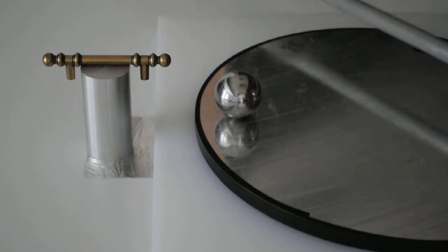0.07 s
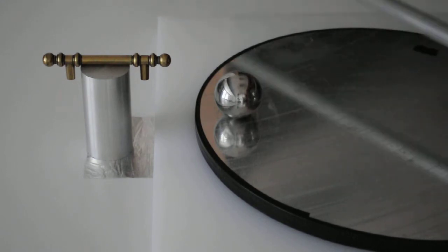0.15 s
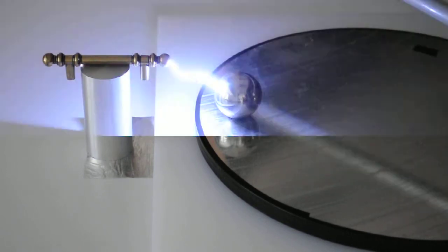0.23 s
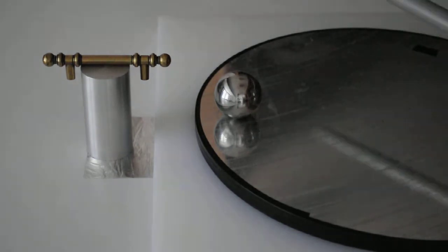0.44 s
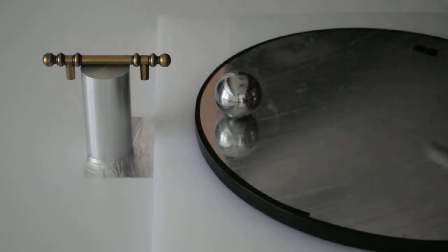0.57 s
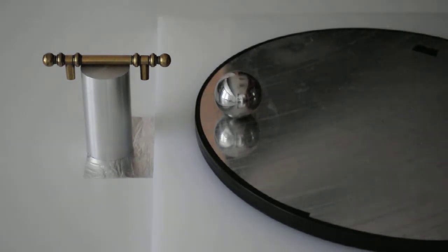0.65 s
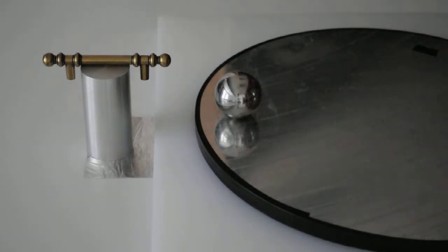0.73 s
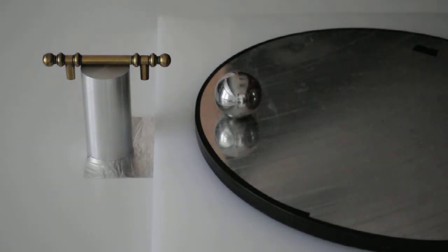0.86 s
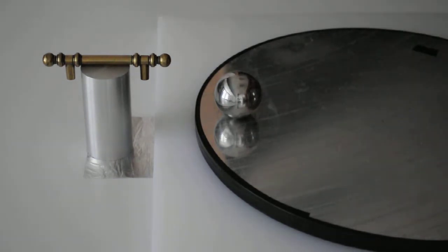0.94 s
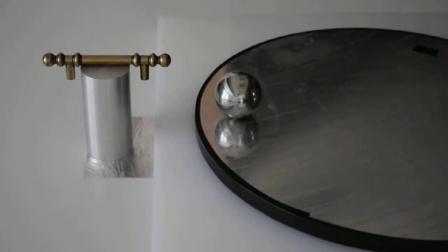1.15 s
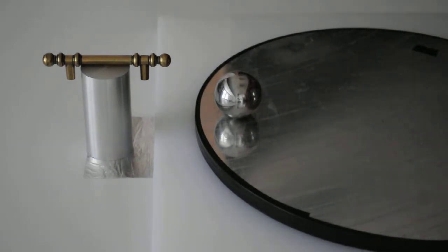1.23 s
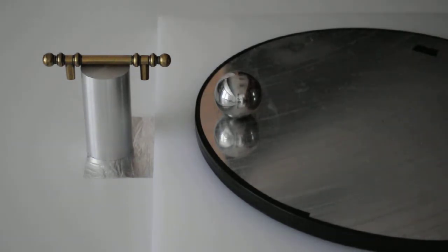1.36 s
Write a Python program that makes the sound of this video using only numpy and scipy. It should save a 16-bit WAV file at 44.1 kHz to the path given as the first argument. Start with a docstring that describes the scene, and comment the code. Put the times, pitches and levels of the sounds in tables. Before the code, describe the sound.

A single loud snap of an electric spark between metal parts follows a brief, faint crackle. It distorts the small microphone, then leaves a short, noisy echo in a hard-walled room with a faint ventilation rumble.

```python
"""In a hard-walled room with a low ventilation rumble, an electrostatic generator charges a metal ball.
Leaking charge hisses faintly and ticks; then one spark jumps to a brass rod and the heated air cracks.
The blast overloads a camera's small microphone and rings on as echoes and reverberation.
The camera's gain control ducks at the crack and swells back while the room dies away."""
import sys
import numpy as np
from scipy import signal
from scipy.fft import rfft, irfft
from scipy.io import wavfile
from scipy.ndimage import uniform_filter1d

SR = 44100
rng = np.random.default_rng(int(sys.argv[2]) if len(sys.argv) > 2 else 0)


def log_audio(samples):
    """Write samples as a 16-bit WAV file to the path given in sys.argv[1]."""
    # one column per channel
    frames = np.atleast_2d(samples).T
    # limit to full scale, then quantise
    limited = np.clip(frames, -1, 1)
    pcm = np.round(limited * 32767).astype(np.int16)
    wavfile.write(sys.argv[1], SR, pcm)


N = 61739

# spectrum of the crack: f/Hz, relative level/dB
CRACK_SPECTRUM = [(100, -22.5), (500, 1), (1300, -0.5), (2400, 1.5), (4000, -9.5), (6000, -15)]
# reflections from the table and nearest walls: delay t/s, level/dB relative to the crack
EARLY_ECHOES = [(.0038, -5.5), (.0049, -3), (.0076, -2.5), (.0106, -1.5), (.0162, -7.5), (.0274, -8.5)]
# modes of the microphone and its case: f/Hz, level/dB, decay time T60/s
CASE_MODES = [(155, -1, 0.047), (236.3, 4, 0.051), (391, 4, 0.078), (554, -5.5, 0.086), (671, 0.5, 0.048),
              (887, -5.5, 0.01), (1355, -6, 0.061)]
# reverberation of the room: f/Hz, relative level/dB, decay time T60/s
ROOM_BANDS = [(60, -44, .3), (148.5, -28.5, .3), (350, -9.5, .45), (710, -6.5, 0.62), (1500, -8, 0.83),
              (2700, -2.5, 0.7), (4500, 1.8, 0.65), (6060, 0, 0.6)]
# small discharges before the spark: t/s, level/dB
LEAK_TICKS = [(0.0672, -23), (0.0703, -32.5), (0.0742, -32.5), (0.0981, -30), (0.1442, -26), (0.165, -24.5),
              (0.1695, -29.5), (0.1986, -20.5), (.2340, -30)]
# spectrum of the corona hiss: f/Hz, relative level/dB
CORONA_SPECTRUM = [(200, -10.5), (800, -6), (1500, -6), (3000, -3.5), (5000, -3.5), (6000, -7.5)]
# spectrum of the ventilation rumble: f/Hz, relative level/dB
RUMBLE_SPECTRUM = [(20, -25), (55, -8), (95, -4.5), (190, 0), (300, -1.5), (700, -6), (1100, -13.5),
                   (2000, -20), (3500, -25), (6000, -27.5)]
# tones of the ventilation: f/Hz, rms level/dB
HUM_TONES = [(59.5, -65), (193.8, -62.5), (236.9, -66.5), (360.7, -69.5), (570.6, -72.5), (721.4, -67.5)]

SPARK_S = .2439  # moment of breakdown


def spark(crack_db=13.5, room_db=4):
    """Superposition: the direct crack adds to its echoes, the case's damped modes and the reverberation."""
    out, t = np.zeros(N), np.arange(N) / SR
    add(out, SPARK_S, amp(crack_db) * crack())
    for delay, db in EARLY_ECHOES:
        add(out, SPARK_S + delay, amp(crack_db + db) * crack())
    for hz, db, t60 in CASE_MODES:
        ring = amp(db) * 1000. ** (-t / t60) * np.sin(2 * np.pi * hz * t)
        add(out, SPARK_S + .0007, -ring)  # a thump just behind the blast
    add(out, SPARK_S, amp(room_db) * room_response())
    return out


def crack(decay_s=.00037):
    """Thermal expansion: suddenly heated air sends out a pressure burst that decays exponentially."""
    fade = np.exp(-np.arange(512) / SR / decay_s)
    burst = noise(CRACK_SPECTRUM)[:len(fade)] * fade
    return burst * np.linalg.norm(fade) / np.linalg.norm(burst)


def room_response(linger_db=-37.5, linger_t60=1.64):
    """Double-slope decay: the room's impulse response has a main tail and a faint, slower one."""
    main = reverberation(lambda hz: interpolate(ROOM_BANDS, hz, column=2))
    lingering = reverberation(lambda hz: np.full(len(hz), linger_t60))
    return main + amp(linger_db) * lingering


def reverberation(t60, build_s=.005):
    """Diffuse field: reflections build up, then absorption takes 60 dB from each frequency in t60(hz)."""
    reflections = noise(ROOM_BANDS, grain_db=.46)  # they arrive in uneven clusters
    hz, t, spectra = signal.stft(reflections, SR, nperseg=512, noverlap=384)
    decay = 1000. ** (-t / t60(hz)[:, None])
    tail = signal.istft(spectra * decay, SR, nperseg=512, noverlap=384)[1][:N]
    return tail * (1 - np.exp(-np.arange(N) / SR / build_s))


def corona(hiss_db=-50, rise_db_per_s=12.5):
    """Corona discharge: leaking charge ticks, and its hiss grows until the spark empties the ball."""
    ticks = np.zeros(N)
    for start, db in LEAK_TICKS:
        add(ticks, start, amp(db) * tick())
    walls = room_response()
    reflected = amp(-10.5) * signal.fftconvolve(ticks, walls / np.linalg.norm(walls))[:N]
    since_spark = np.arange(N) / SR - SPARK_S
    swell = amp(hiss_db + rise_db_per_s * since_spark) * (since_spark < 0)
    return ticks + reflected + swell * noise(CORONA_SPECTRUM)


def tick(compression_s=.00007):
    """Blast wave of a tiny discharge: a sharp compression, then a shallow rarefaction."""
    age = np.arange(128) / SR / compression_s
    pulse = (1 - age) * np.exp(-age)
    return signal.lfilter(*signal.butter(1, 700, "high", fs=SR), pulse)


def ventilation(rumble_db=-52, waver_hz=5):
    """Broadband and tonal noise: a low rumble with tones that waver by random phase modulation."""
    t, hz = np.arange(N) / SR, np.fft.rfftfreq(N, 1 / SR)
    out = amp(rumble_db) * noise(RUMBLE_SPECTRUM)
    slow_band = np.exp(-(hz / waver_hz) ** 2)
    for tone_hz, db in HUM_TONES:
        drift = unit_rms(irfft(rfft(rng.standard_normal(N)) * slow_band, N))
        phase = 2 * np.pi * (tone_hz * t + rng.random()) + 1.7 * drift
        out += amp(db) * np.sqrt(2) * np.sin(phase)
    return out


def noise(spectrum, grain_db=0, top_hz=7000):
    """Spectral shaping: white noise, smooth or grainy, is filtered to a spectrum and scaled to rms 1."""
    clusters = amp(grain_db * unit_rms(uniform_filter1d(rng.standard_normal(N), size=40)))
    hz = np.fft.rfftfreq(N, 1 / SR)
    colour = amp(interpolate(spectrum, hz)) * (hz < top_hz)
    return unit_rms(irfft(rfft(clusters * rng.standard_normal(N)) * colour, N))


def interpolate(table, hz, column=1):
    """Interpolation of one table column on a logarithmic frequency axis."""
    rows = np.array(table)
    return np.interp(np.log(hz + 1), np.log(rows[:, 0] + 1), rows[:, column])


def amp(db):
    """Amplitude ratio of a level in decibels."""
    return 10 ** (np.asarray(db) / 20)


def unit_rms(x):
    """Normalisation to rms 1."""
    return x / np.sqrt(np.mean(x ** 2) + 1e-20)


def add(mix, start_s, sound):
    """Superposition of a delayed sound on the mix."""
    part = mix[round(start_s * SR):][:len(sound)]
    part += sound[:len(part)]


def scene():
    """Superposition: the pressures of all sources sum at one microphone."""
    return (spark() + corona() + ventilation())[None]


def record(dry, limit_db=-11.5, attack_s=.0039, recover_db_per_s=48, overload_db=-2.5):
    """Compression and saturation: in a narrow band, gain ducks fast and recovers slowly; peaks overload."""
    hz = np.fft.rfftfreq(2 * N, 1 / SR)
    treble_loss = np.exp(-(np.maximum(hz - 4911, 0) / 470) ** 2 / 2)  # Gaussian skirt above 4911 Hz
    x = irfft(rfft(dry[0], 2 * N) * treble_loss)[:N]
    x = signal.lfilter(*signal.butter(1, 140, "high", fs=SR), x)
    power_db = 10 * np.log10(abs(uniform_filter1d(x ** 2, size=200, origin=99)) + 1e-12)
    recovery_db = recover_db_per_s * np.arange(N) / SR
    held_db = np.maximum.accumulate(power_db + recovery_db) - recovery_db  # each peak sinks steadily
    excess_db = np.maximum(held_db - limit_db, 0)
    pole = np.exp(-1 / (attack_s * SR))
    duck_db = signal.lfilter([1 - pole], [1, -pole], excess_db)
    x = np.clip(x * amp(-duck_db), -amp(overload_db), amp(overload_db))
    x = signal.lfilter(*signal.butter(1, 8300, fs=SR), x)  # softens the overload's harmonics
    band_limit = signal.firwin(255, 16800, window=("kaiser", 9), fs=SR)
    return signal.oaconvolve(x, band_limit, "same")[None]


dry = scene()
out = record(dry)
log_audio(out)
```